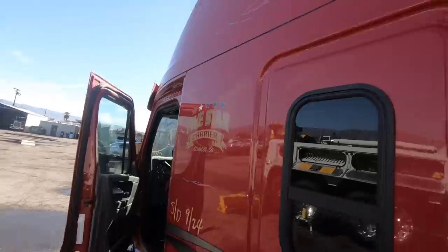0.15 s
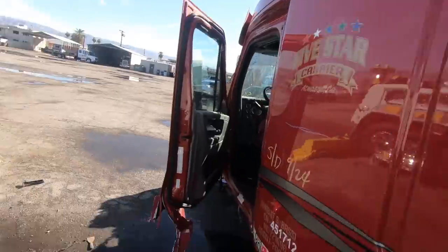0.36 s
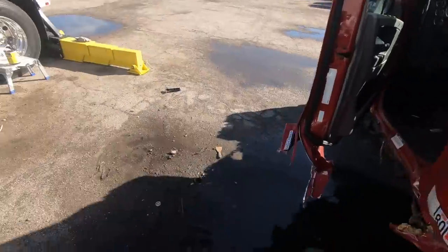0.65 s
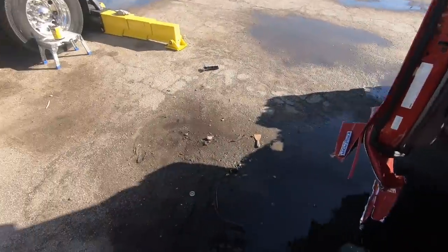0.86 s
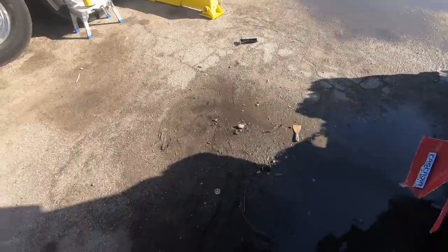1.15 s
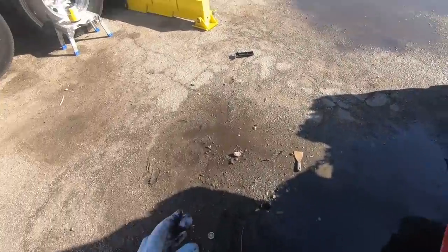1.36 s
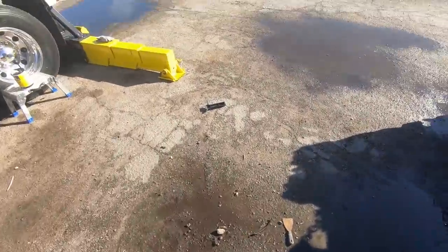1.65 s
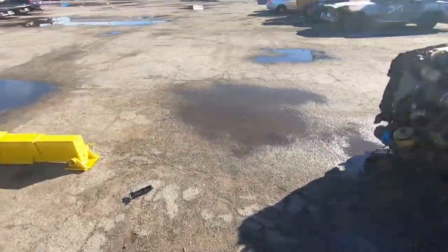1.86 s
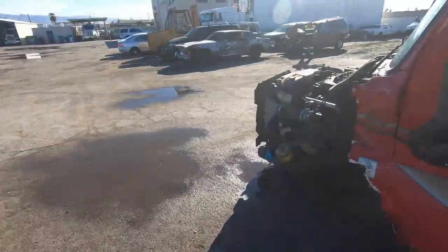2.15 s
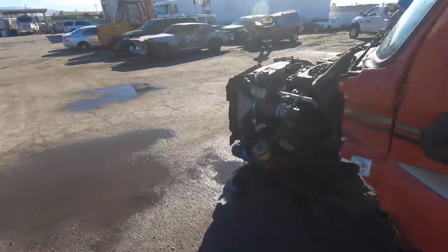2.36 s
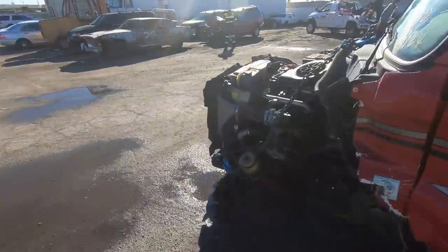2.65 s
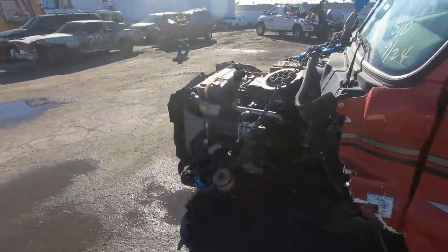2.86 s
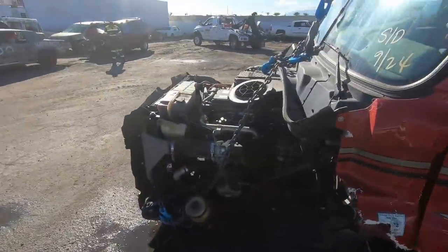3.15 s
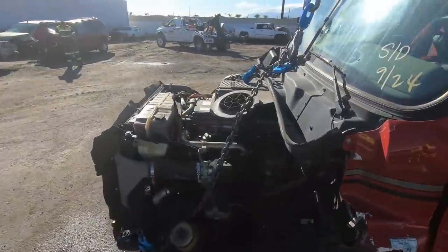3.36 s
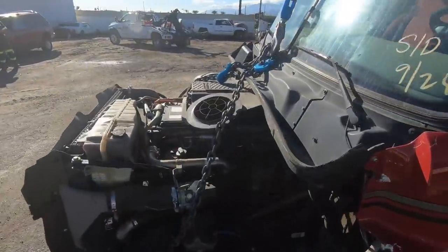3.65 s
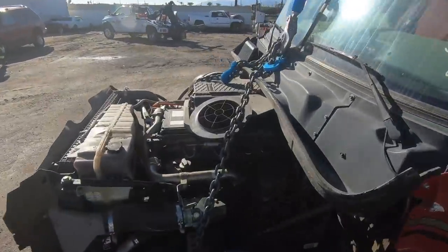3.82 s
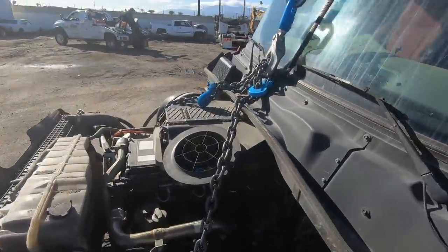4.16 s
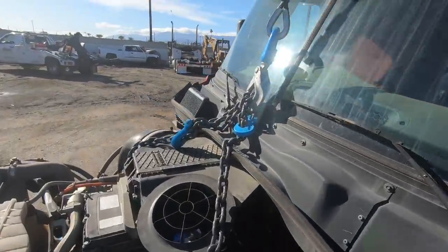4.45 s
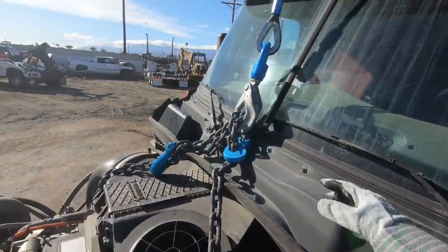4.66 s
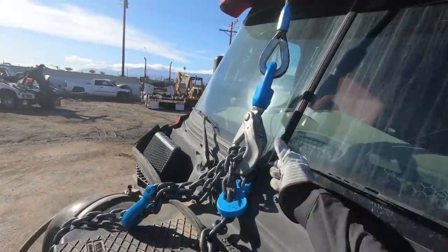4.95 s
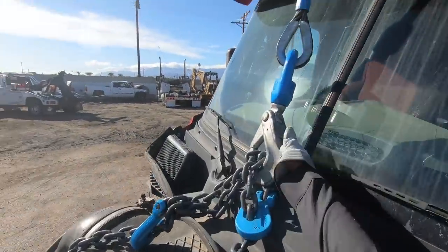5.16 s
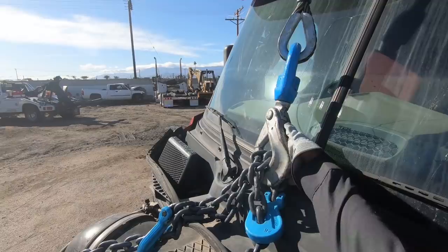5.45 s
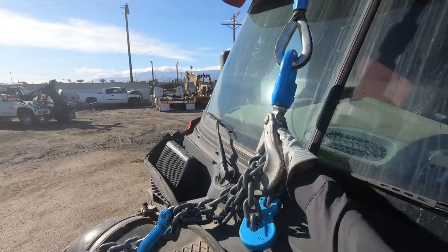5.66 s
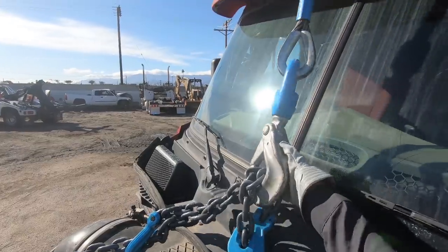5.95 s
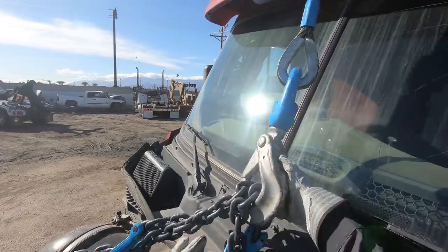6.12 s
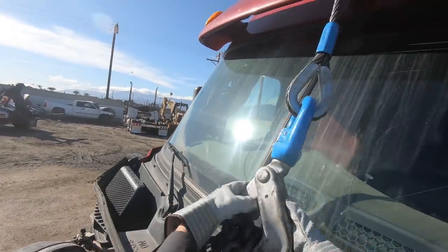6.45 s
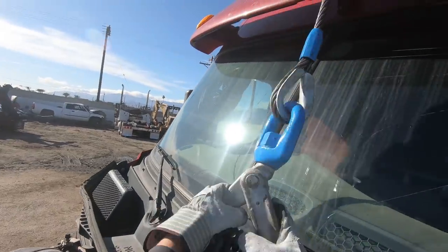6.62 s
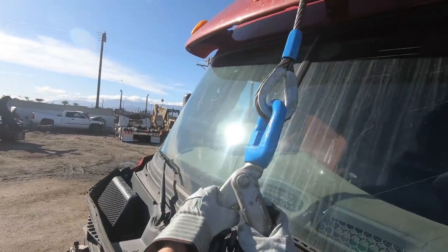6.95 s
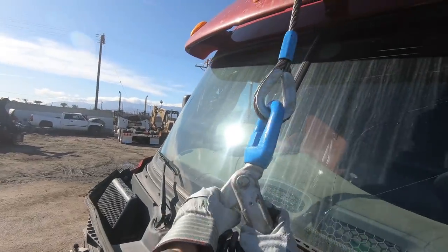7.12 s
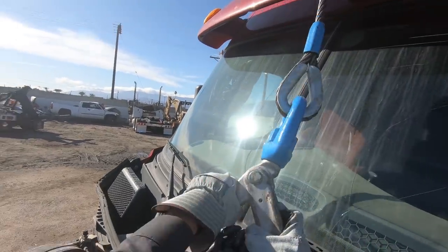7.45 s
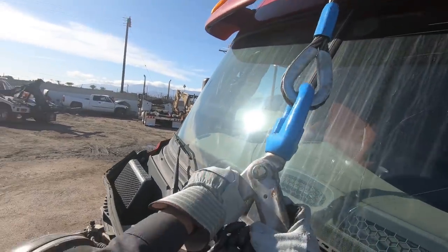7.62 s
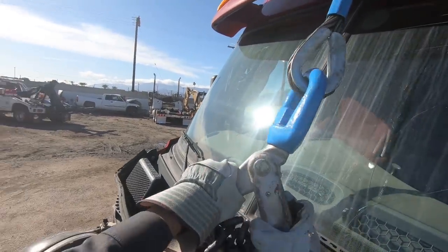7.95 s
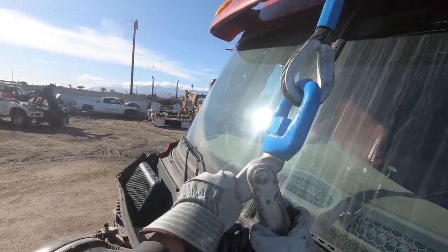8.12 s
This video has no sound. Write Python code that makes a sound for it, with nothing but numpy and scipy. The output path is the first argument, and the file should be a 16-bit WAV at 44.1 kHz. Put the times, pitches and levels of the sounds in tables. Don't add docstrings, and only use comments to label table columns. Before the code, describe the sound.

A heavy diesel idles at constant pace for all 8.3 seconds in an open yard: deep exhaust throb, knocking block, valve clatter, airy intake noise and faint hydraulic pump whine. At 0.5 s a hard, bright fingertip snap hits the camera shell amid low mount bumps until 0.7. From about 0.7 the wide stereo glides to a duller single microphone with slightly lifted hiss, reopening after 3.5 s as the exhaust grows nearer. A faint clink comes at 4.35, with a slight boom from the engine bay around 4 to 4.4. At 5.6-5.85 come padded knocks, bumps and a short iron clank; small ticks at 6.0. The densest handling is 6.15-6.75: sharp clanks, gritty scraping links, thuds and low shaking. Single clunks follow at 7.45 and faintly at 7.76, with soft bumps to the end. Quiet high bird chips occur near 4.6, 5.3, 5.8, 7.9 and 8.2.

```python
import sys
import numpy as np
from scipy import signal
from scipy.fft import rfft, irfft, next_fast_len
from scipy.io import wavfile
from scipy.ndimage import map_coordinates

SR = 44100
rng = np.random.default_rng(int(sys.argv[2]) if len(sys.argv) > 2 else 0)


def amplitude_ratio(level_db):
    exponent = np.asarray(level_db, float) / 20
    return 10 ** exponent


def store_pcm(level_fs):
    pcm = np.round(np.clip(level_fs, -1, 1) * 32767).astype(np.int16)
    wavfile.write(sys.argv[1], SR, np.atleast_2d(pcm).T)


N = 365148

# time in seconds, openness in dB, facing the intake in dB, pump load in dB.
ENGINE_PATH = [(0, 5.5, 3.5, -4.5), (.5, 6, 6, 3), (1, 3, -1.5, 3), (1.3, 2, 2, -7), (1.9, .5, 3, -4),
               (2.3, 2, -0.5, -0.5), (2.8, 1, -4, -0.5), (3.4, -0.5, -3.5, -5.5), (3.7, 0, 1, 0.5),
               (4.5, 3, 2, -2.5), (4.9, 2, -0.5, -0.5), (5.15, 0, -3.5, -1.5), (5.8, 1, -1, 1.5),
               (6.2, 2.5, -0.5, 3), (6.9, 0, -4, -1.5), (7.3, 2, -3, -2), (7.7, 1.5, -1.5, -0.5),
               (8.28, 3, -1.5, 4.5)]
# time in seconds, nearness in dB, firing order over its octave in dB.
EXHAUST_PATH = [(0, -23, 1.5), (.3, -23.5, 0.5), (.7, -22, -3.5), (1.2, -29.5, -7), (1.6, -26.5, -12),
                (2.8, -27.5, -13.5), (3.15, -29.5, -7.5), (3.45, -26, -18), (3.75, -25, -6),
                (4.1, -19.5, -9.5), (4.4, -23.5, -9), (4.75, -19, -12), (5.05, -22, -8.5),
                (5.4, -20, -11.5), (6.05, -20.5, -9.5), (6.4, -26, -6.5), (7.3, -21.5, -10),
                (8.28, -21, -6.5)]
# time in seconds, metres nearer.
WALK = [(0, -.5), (.45, -.45), (.9, .1), (1.5, .65), (3, .85), (3.6, .55), (3.9, .2), (4.2, .4), (4.5, .25),
        (4.8, .5), (5.4, .5), (5.8, .05), (7.2, -.1), (7.6, .2), (8.28, .45)]
# multiple of the camshaft rate, rms near the hook in dB, share of nearness changes.
WEAK_ORDERS = [(7.94, -46.5, -2), (9.01, -39.5, 2), (10, -40.5, 0.5), (15.04, -41, 0.5), (18, -34.5, 1.2),
               (20.98, -50.5, -1.8), (21.82, -47.5, -0.3), (24.18, -47.5, 0), (25.92, -45, 0.4)]
CYLINDERS_DB = [0, -1, .6, -1.5, 1, -.6]
# frequency in Hz, density in dB per Hz.
BLOCK_COLOUR = [(120, -30), (220, -9), (400, -9.5), (560, -4), (730, -1), (900, -6), (1100, -8.5),
                (1310, -5), (1520, -13.5), (1800, -11.5), (2200, -15), (2500, -26.5), (3200, -62),
                (6000, -120)]
VALVE_COLOUR = [(600, -120), (1800, -42.5), (2500, -1), (3200, -3.5), (4000, -10), (4600, -13.5),
                (5500, -22.5), (9000, -120)]
AIR_COLOUR = [(1000, -120), (3500, -34), (4500, -6), (5500, -2), (6050, 3), (6600, -3), (7600, 1),
              (8300, -9), (9500, -16), (10500, -23.5), (11200, -27.5), (12000, -33.5), (12900, -43.5),
              (13600, -120)]
RUMBLE_COLOUR = [(8, -35.5), (14, -4), (40, -9.5), (52, 2), (62, 10.5), (95, 1), (125, 3.5), (170, -5),
                 (250, -12), (400, -51), (1500, -120)]
# frequency in Hz, density in dB per Hz.
SWAY_COLOUR = [(4, -29), (10, -3), (20, -12), (28, -2.5), (35, -9), (42, -3), (55, -14.5), (100, -120)]
# start in seconds, hold in seconds, rumble lift in dB.
SHAKES = [
    (0.444, 0.2, 7.5),
    (5.74, 0.16, -1.5),
    (6.206, 0.44, 9.5),
]
# start, hold in seconds, lift in dB, rise, fall in seconds.
CLEAR_VIEW = (1.8, 3, 2.7, 0.38, 0.13)
# multiple of the tooth rate, level in dB.
PUMP_WHINE = [(1, -56.5), (2, -59), (3, -55.5), (4, -58), (5, -61)]
# frequency in Hz, level behind the wreck in dB, level at the hook in dB.
PIPE_HUMS = [(235.5, -58, -62.5), (310.3, -52, -52.5), (583, -66.5, -57.5), (644, -47, -68.5),
             (691, -58.5, -46.5), (722.5, -50, -44), (776, -62.5, -51.5), (865, -63, -56.5),
             (1282, -64.5, -50.5), (1998, -61, -52.5)]
# start, hold in seconds, frequency in Hz, peak in dB.
OPEN_BAY = (4, 0.44, 244.5, -42)
# start, hold in seconds, lift in dB, rise, fall in seconds.
GAIN_LIFTS = [
    (.4, 0.074, 20, 0.6, 0.62),
    (1.5, 2.4, 13, 0.8, 2.6),
]
# frequency in Hz, density in dB per Hz.
HISS_COLOUR = [(8000, -120), (10500, -27), (11800, -1.5), (12800, 2.5), (13300, -7.5), (14000, -120)]
HISS_TOP_COLOUR = [(12000, -120), (13000, 0), (14000, -1), (15000, -11), (15700, -20), (16200, -120)]
# start in seconds, peak in dB, frequency in Hz.
MOUNT_BUMPS = [(.06, -24.5, 300), (0.13, -27, 278), (0.454, -27.5, 150.6), (.462, -18.5, 300),
               (.498, -26.5, 280), (0.514, -14, 170), (0.527, -12.5, 85.6), (.6, -16.5, 86),
               (.635, -11.5, 132.7), (.665, -13.5, 120), (0.682, -23.5, 203), (5.572, -24.5, 458),
               (5.592, -15.5, 122), (5.647, -18.5, 486), (5.672, -9.5, 134.6), (5.678, -17, 455),
               (5.704, -14, 102), (5.829, -11.5, 138), (5.85, -14.5, 105.6), (6.185, -12, 94),
               (6.19, -16, 208), (6.325, -20.5, 350), (6.211, -8.5, 116.5), (6.265, -12.5, 320),
               (6.268, -15.5, 111.3), (6.3, -19.5, 477), (6.31, -10.5, 130.6), (6.335, -11, 99.3),
               (6.371, -8.5, 228.5), (6.376, -16.5, 441), (6.398, -12, 94.8), (6.4, -21, 550),
               (6.412, -12, 103.8), (6.473, -10.5, 95), (6.5, -9, 96), (6.496, -22.5, 400),
               (6.528, -10.5, 91.5), (6.625, -25.5, 304), (6.633, -17, 134), (6.689, -13.5, 117.4),
               (6.688, -17, 466), (6.7, -22, 323), (6.695, -19, 201), (6.729, -12.5, 90),
               (7.45, -21.5, 228), (7.715, -17.5, 135), (7.901, -19.5, 131), (8.045, -24, 334),
               (8.083, -25, 313), (8.2, -14.5, 144.3)]
# start in seconds, hold in seconds, level in dB.
DRAGS = [
    (0.308, 0.17, -36),
    (5.69, 0.058, -39.5),
    (6.198, 0.06, -32.5),
    (6.314, 0.1, -37.5),
    (6.453, 0.028, -30),
]
# frequency in Hz, density in dB per Hz.
IRON_COLOUR = [(50, -120), (200, -28.5), (550, 1), (1200, -1), (2200, -18), (5000, -23.5), (8000, -26),
               (10000, -39), (13500, -43), (16000, -120)]
# start in seconds, clank in dB, dull knock over the clank in dB, hardness in dB,
# 60 dB decay in seconds.
LINK_TICKS = [(.507, -40.5, 17, 12, 0.048), (4.828, -45, 5, -14, 0.034), (5.7035, -50, 2, 12, .012),
              (5.9733, -32, -11, 1, 0.009), (5.9785, -39, -5, -2.5, 0.015), (6.012, -44.5, -1, -7.5, .02),
              (6.224, -42, -0.5, 3, .04), (6.257, -40.5, -0.5, -2.5, .02), (6.264, -45, 1, 4.5, .03),
              (6.272, -41.5, 2, -1, .02), (6.315, -30, -7, -12, 0.025), (6.33, -40.5, -1, -2, .02),
              (6.343, -43, -1, 2, .02), (6.3675, -35, 1, -6.5, 0.018), (6.395, -34, -1, -7, .015),
              (6.5275, -39, -5, -1.5, .02), (6.686, -32.5, -3, -2, 0.013), (6.778, -43, -7, -10, 0.015)]
HEAVY_CLANKS = [(4.351, -30.5, 6, -7, .02), (5.6685, -30, -5, -2, .012), (5.691, -18, -10, 4.5, 0.024),
                (5.713, -24, -13, 10, 0.015), (6.147, -25, -4, -7, 0.036), (6.191, -25, 10, 0, 0.04),
                (6.2085, -10, -6.5, 6, 0.014), (6.212, -22, -2, -7, 0.036), (6.231, -23.5, 0, -3, 0.06),
                (6.266, -15.5, -3.5, -11, 0.025), (6.3345, -18.5, 1.5, -6, .025),
                (6.341, -21, 5.5, -11, .03), (6.351, -27.5, 0.5, -11, .03), (6.3623, -23, -1, -4, .02),
                (6.38, -21.5, -1, -14, .04), (6.394, -19, 3.5, 1, 0.034), (6.412, -19, 0.5, -14, .04),
                (6.4495, -16, 2, -3, 0.04), (6.489, -14, -3.5, 0, 0.032), (6.503, -26, -1, -4, .04),
                (6.689, -15.5, -6.5, 6, 0.02), (7.449, -21, -10, -9, 0.02),
                (7.452, -18.5, -1.5, -19, 0.042), (7.459, -22.5, 1, -18, 0.029),
                (7.471, -29, 13, -12, 0.023), (7.759, -36, -7, -1, .03)]
# start in seconds, clank in dB, dull knock over the clank in dB,
# hardness in dB, hold in seconds.
LINK_SCRAPES = [
    (6.312, -20.5, -2.5, 1, .008),
    (6.392, -19, 1, 9.5, 0.0081),
    (6.445, -24.5, -5.5, 13, 0.0088),
    (6.471, -28, 3, 6, .006),
    (6.485, -15, 1.5, 8, .007),
]
# start in seconds, peak in dB, top frequency in Hz.
HAND_KNOCKS = [(4.351, -33, 1800), (5.574, -28.5, 600), (5.668, -8, 1050), (5.676, -23, 632),
               (5.8271, -10.5, 1050), (6.19, -21.5, 900), (6.266, -20, 1020), (6.335, -19, 1410),
               (6.372, -15, 682), (6.392, -13, 687), (6.487, -17, 910), (6.69, -22, 717),
               (7.452, -17, 1290), (7.461, -25.5, 914), (7.471, -24, 796)]
# start in seconds, frequency in Hz, peak in dB, 60 dB decay in seconds.
STEEL_RINGS = [(5.6, 4700, -46, .08), (5.9735, 3320, -33, 0.0087), (5.9735, 5600, -27, 0.009),
               (5.979, 5200, -38, .012), (6.226, 4920, -37, 0.08), (6.52, 6150, -44, .05),
               (5.705, 11900, -54, .12), (5.704, 12150, -57, .1), (5.704, 13050, -57, .15),
               (5.706, 13400, -57, .12), (5.977, 12050, -51, .04), (5.975, 13500, -51, .04),
               (6.718, 6050, -45, .05)]
# start in seconds, peak in dB, centre in Hz, 60 dB decay in seconds,
# width as a ratio to each side.
SHELL_TAP = [
    (.5011, -25, 2600, .006, 1.7),
    (.5043, -6.5, 8300, .005, 1.18),
    (.5042, -21, 1100, .008, 1.5),
    (.5, -24, 420, .04, 1.4),
    (.5044, -17, 2300, .007, 1.4),
    (.5065, -28, 7800, .015, 1.1),
    (.5044, -18, 4000, .006, 1.3),
    (.5044, -21, 6000, .006, 1.16),
    (.5042, -39, 14000, .006, 1.1),
    (.5011, -26, 7500, .015, 1.15),
]
# start in seconds, length in seconds, start in Hz, end in Hz, peak in dB.
BIRD_CHIPS = [
    (4.583, 0.04, 6420, 6300, -41),
    (5.257, 0.043, 6000, 6130, -43),
    (5.76, 0.037, 6430, 6230, -41),
    (7.854, 0.055, 6700, 5370, -49),
    (8.232, 0.033, 6100, 5960, -46),
]
# frequency in Hz, level in dB, phase in radians,
# likeness from 0 to 1.
LEFT_AT_CAB = [(35, -2.5, 0, .998), (75, -2.5, -.03, .996), (120, -4, -.1, .88), (200, -4, -.1, .93),
               (350, -3, -.2, .9), (480, -6, -2, .3), (650, -9, -3.8, .8), (1200, -3, -4.3, .72),
               (2300, -2, -5, .65), (4300, -3, -5.6, .6), (4800, -5, -7, .2), (6000, -8, -9.2, .3),
               (8000, -9, -9.8, .4), (11000, -2, -10, .3)]
LEFT_AT_HOOK = [(75, -2.2, -.1, .996), (110, -5, -.3, .75), (200, -3, -.2, .88), (350, -2, -.4, .9),
                (480, -7, -2.5, .3), (650, -11, -3.7, .95), (1200, -6, -4.3, .94), (2900, -7, -4.2, .85),
                (4000, -8, -5.4, .75), (4600, -13, -6.5, .25), (5200, -10, -8.4, .65),
                (7700, -11, -9.2, .65), (8500, -10, -9, .4), (11000, -1, -9.4, .4)]
# frequency in Hz, level in dB, phase in radians.
SINGLE_MIC = [(110, -4, 0), (140, -3, -1), (200, 3.5, -1), (300, 2, -1), (450, 2, -1), (548, -9, 1.5),
              (950, -5.5, 2), (1290, -6.5, 2.5), (1950, -9, 2.5), (3430, -15, 2), (4650, -0.5, 1.5),
              (6000, -6, 2), (7000, -19.5, 0.5), (8100, -15, 4), (10500, -18, -2.5)]

TIME = np.arange(N) / SR


def unit(x):
    return x / np.sqrt(np.mean(x ** 2) + 1e-20)


def along(points, hz):
    f, *cols = np.transpose(points)
    return np.squeeze([np.interp(np.log(hz + 1), np.log(f + 1), c) for c in cols])


def curves(rows):
    s, *cols = np.transpose(rows)
    return [np.interp(TIME, s, c) for c in cols]


def swell(s, hold, rise, fall):
    return np.interp(TIME, [s - rise, s, s + hold, s + hold + fall], [0, 1, 1, 0])


def wobble(rate):
    coarse = np.arange(0, N + 64, 64)
    knots = rng.standard_normal(int(N * rate / SR) + 4)
    return np.interp(np.arange(N), coarse, map_coordinates(knots, [coarse * rate / SR]))


def filtered(x, response):
    m = next_fast_len(N + 8192)
    return irfft(rfft(x, m) * response(np.fft.rfftfreq(m, 1 / SR)), m)[..., :N]


def rush(colour, gate):
    noise = gate * rng.standard_normal((2, N))
    return unit(filtered(noise, lambda hz: amplitude_ratio(along(colour, hz))))


def band(x, lo_hz, hi_hz):
    y = signal.sosfilt(signal.butter(3, [lo_hz, hi_hz], "band", fs=SR, output="sos"), x)
    return y / np.max(np.abs(y[0]))


def place(out, s, sound):
    out[..., round(s * SR):][..., :sound.shape[-1]] += sound


def camshaft():
    cam_hz = 69.825 / 12
    nearer_s = curves(WALK)[0] / 343
    return .077 + cam_hz * (TIME + nearer_s) + .002 * wobble(4)


def exhaust(cam, octave_db, favour_db):
    def tone(order, db, lead):
        return np.sqrt(2) * amplitude_ratio(db) * np.cos(2 * np.pi * order * cam + lead)

    out = tone(12, octave_db + 1 + .6 * wobble(9), 1.15)
    out += tone(6, octave_db + favour_db + 1 + .6 * wobble(6), 0)
    for order, db, share in WEAK_ORDERS:
        nearness_db = share * (octave_db + 21)
        out += tone(order, db + nearness_db + 2.5 * wobble(3), 2 * np.pi * rng.random())
    return out


def firing_knock(cam):
    firing, since = np.divmod(6 * cam, 1)
    firing = firing.astype(int)
    strength_db = np.array(CYLINDERS_DB)[firing % 6] + 2.45 * rng.standard_normal(400)[firing]
    return amplitude_ratio(strength_db - 5.7 * since)


def machinery(knock, block_db, air_db):
    valve_db = -3.5 + 0.77 * block_db + 0.32 * air_db
    start, hold, lift_db, rise, fall = CLEAR_VIEW
    valve_db += lift_db * swell(start, hold, rise, fall)
    block = amplitude_ratio(block_db - 37.0 + 0.13 * wobble(5.7)) * rush(BLOCK_COLOUR, 1 + 0.49 * knock)
    valves = amplitude_ratio(valve_db - 50.0 + 0.28 * wobble(6.5)) * rush(VALVE_COLOUR, 1 + 1.5 * knock)
    air = amplitude_ratio(air_db - 51.5 + 1.2 * wobble(11)) * rush(AIR_COLOUR, 1 + 0.62 * knock)
    return block + valves + air


def rumble_and_sway(octave_db):
    usual_db = -36.5
    rumble_db = usual_db + 0.49 * (octave_db + 18)
    for s, hold, db in SHAKES:
        rumble_db += db * swell(s, hold, 0.62, 0.27)
    rumble = amplitude_ratio(rumble_db + 5.5 + 1.1 * wobble(6)) * rush(RUMBLE_COLOUR, 1)
    sway_db = -33.5 + 1.2 * (rumble_db - usual_db)
    return rumble + amplitude_ratio(sway_db + wobble(2.5)) * rush(SWAY_COLOUR, 1)


def pump(load_db):
    teeth = 442.8 * TIME + 0.019 * wobble(15)
    return sum(amplitude_ratio(db + 6.5 + load_db + 0.38 * wobble(6)) * np.sin(2 * np.pi * k * teeth)
               for k, db in PUMP_WHINE)


def pipes_and_bay():
    near = swell(5.1, N / SR, 0.73, 1)
    out = np.zeros(N)
    for hz, db, near_db in PIPE_HUMS:
        level = amplitude_ratio(db + near * (near_db - db) + 2.9 * wobble(8))
        out += level * np.sin(2 * np.pi * (hz * TIME + 0.13 * wobble(20)))
    start, hold, hz, db = OPEN_BAY
    level = swell(start, hold, 0.15, .3) * amplitude_ratio(db + 2.3 * wobble(11.0))
    return out + level * np.sin(2 * np.pi * (hz * TIME + 0.27 * wobble(20)))


def engine():
    octave_db, favour_db = curves(EXHAUST_PATH)
    block_db, air_db, load_db = curves(ENGINE_PATH)
    cam = camshaft()
    tones = exhaust(cam, octave_db, favour_db) + pump(load_db) + pipes_and_bay()
    noises = machinery(firing_knock(cam), block_db, air_db) + rumble_and_sway(octave_db)
    return noises + [[1], [0]] * tones


def camera_hiss():
    lift_db = sum(db * swell(s, hold, rise, fall) for s, hold, db, rise, fall in GAIN_LIFTS)
    top_db = 1.1 * np.minimum(lift_db - GAIN_LIFTS[1][2], 0)
    hiss = rush(HISS_COLOUR, amplitude_ratio(wobble(30)))
    hiss += amplitude_ratio(top_db) * rush(HISS_TOP_COLOUR, amplitude_ratio(wobble(30)))
    return amplitude_ratio(-94 + lift_db) * hiss


def bumps():
    out, t = np.zeros((2, N + SR)), np.arange(SR // 2) / SR
    for s, db, hz in MOUNT_BUMPS:
        shape = amplitude_ratio(-60 * t * hz / 20.8) * (1 - np.exp(-t / 0.0025))
        wave = np.sin(2 * np.pi * hz * t + [[0], [1.6]])
        wave += 0.74 * band(rng.standard_normal((2, len(t))), 0.45 * hz, 1.72 * hz)
        place(out, s, amplitude_ratio(db) * shape * wave)
    return out[:, :N]


def drag():
    level = np.zeros(N)
    for s, hold, db in DRAGS:
        on = swell(s, hold, 0.057, 0.11)
        level += (on > 0) * amplitude_ratio(db - 23.5 * (1 - on))
    return level * rush(IRON_COLOUR, amplitude_ratio(4 * wobble(50)))


def contact(weight_db, hard_db, t60, hold, crack_db, edge_db):
    t = np.arange(SR // 8) / SR
    burst = rng.standard_normal((2, len(t))) + 2.6 * (t < .0004)
    burst *= amplitude_ratio(-60 * np.maximum(t - hold, 0) / t60) * (1 - np.exp(-t / 0.00033))
    hit = amplitude_ratio(weight_db) * band(burst, 330, 1050)
    hit += band(burst, 730, 1630) + amplitude_ratio(-8.0) * band(burst, 1790, 2860)
    hit += amplitude_ratio(crack_db + 0.19 * hard_db) * band(burst, 2900, 5700)
    edge = band(burst, 6200, 8100) + amplitude_ratio(-3.5) * band(burst, 5500, 6400)
    edge += amplitude_ratio(-17) * band(burst, 8200, 10300) + amplitude_ratio(-25.5) * band(burst, 11600, 14200)
    return hit + amplitude_ratio(edge_db + hard_db) * edge


def links():
    out = np.zeros((2, N + SR))
    for s, db, weight_db, hard_db, t60 in LINK_TICKS:
        place(out, s, amplitude_ratio(db) * contact(weight_db, hard_db, t60, 0, 5.8, 0))
    for s, db, weight_db, hard_db, t60 in HEAVY_CLANKS:
        place(out, s, amplitude_ratio(db) * contact(weight_db, hard_db, t60, 0, -14, -25))
    for s, db, weight_db, hard_db, hold in LINK_SCRAPES:
        place(out, s, amplitude_ratio(db) * contact(weight_db, hard_db, .018, hold, -14, -25))
    return out[:, :N]


def hand_knocks():
    out, t = np.zeros((2, N + SR)), np.arange(SR // 8) / SR
    for s, db, top_hz in HAND_KNOCKS:
        thud = [[1], [.3]] * (t == 0)
        for low_hz in (300, 160, 60):
            thud = band(thud, low_hz, top_hz)
        place(out, s, amplitude_ratio(db) * thud)
    return out[:, :N]


def steel_rings():
    out, t = np.zeros(N + SR), np.arange(SR // 8) / SR
    for s, hz, db, t60 in STEEL_RINGS:
        place(out, s, amplitude_ratio(db - 60 * t / t60) * np.sin(2 * np.pi * hz * t) * (1 - np.exp(-t / 0.00085)))
    return [[1], [0]] * out[:N]


def tap():
    out, t = np.zeros((2, N + SR)), np.arange(SR // 20) / SR
    for s, db, hz, t60, width in SHELL_TAP:
        burst = [[1, .3], [1, 0]] @ rng.standard_normal((2, len(t))) + 6 * (t < .00006)
        burst = amplitude_ratio(-60 * t / t60) * burst
        place(out, s, amplitude_ratio(db) * band(burst, hz / width, hz * width) * amplitude_ratio([[-1.5], [.5]]))
    left, right = out[:, :N]
    return np.array([(left + np.roll(left, 1)) / 2, right])


def bird():
    out = np.zeros(N + SR)
    for s, length, start_hz, end_hz, db in BIRD_CHIPS:
        hz = np.linspace(start_hz, end_hz, round(length * SR))
        place(out, s, amplitude_ratio(db) * np.hanning(len(hz)) * np.sin(2 * np.pi * np.cumsum(hz) / SR))
    return [[1], [.5]] * out[:N]


def scene():
    chain = drag() + links() + hand_knocks() + steel_rings()
    return engine() + bumps() + chain + bird()


def left_port(dry, table):
    def response(hz):
        db, turn, alike = along(table, hz)
        alike = np.clip(alike, 0, 1)
        return amplitude_ratio(db) * np.exp(1j * turn) * [alike, np.sqrt(1 - alike ** 2)]
    return filtered(dry, response).sum(axis=0)


def single_microphone(direct):
    def response(hz):
        db, turn = along(SINGLE_MIC, hz)
        return amplitude_ratio(db) * np.exp(1j * turn)
    return filtered(direct, response)


def band_limit(x):
    return signal.sosfilt(signal.butter(12, 15720, fs=SR, output="sos"), x)


def record(dry):
    wide_off_s, wide_on_s, glide_s = 0.68, 3.488, 0.33
    fading = np.exp(-np.maximum(TIME - wide_off_s, 0) / glide_s)
    rising = 1 - np.exp(-np.maximum(TIME - wide_on_s, 0) / glide_s)
    wide = fading + rising
    left = fading * left_port(dry, LEFT_AT_CAB) + rising * left_port(dry, LEFT_AT_HOOK)
    mix = np.array([left, wide * dry[0]]) + (1 - wide) * single_microphone(dry[0])
    mix += camera_hiss() + tap()
    return band_limit(mix)


dry = scene()
out = record(dry)
store_pcm(out)
```